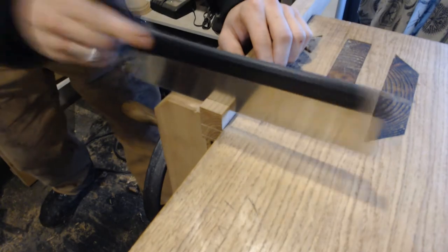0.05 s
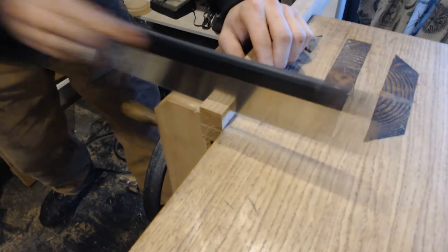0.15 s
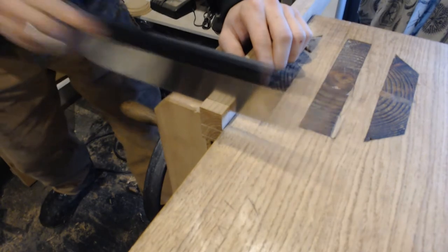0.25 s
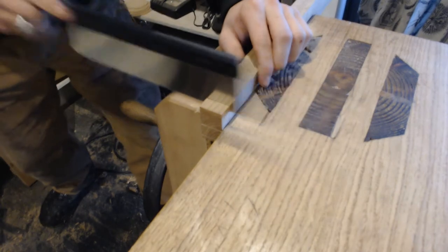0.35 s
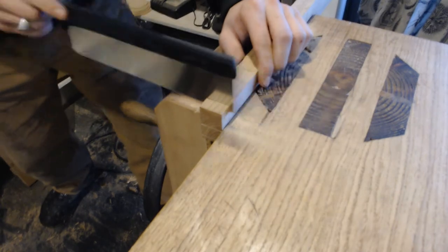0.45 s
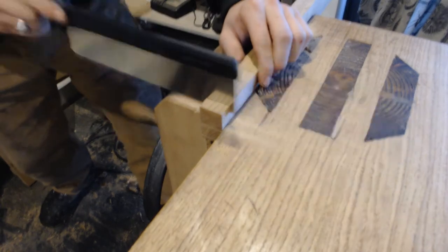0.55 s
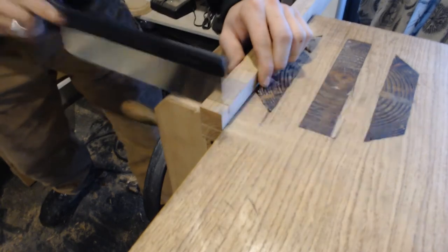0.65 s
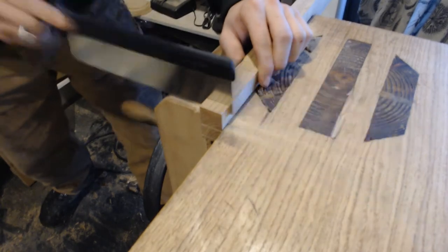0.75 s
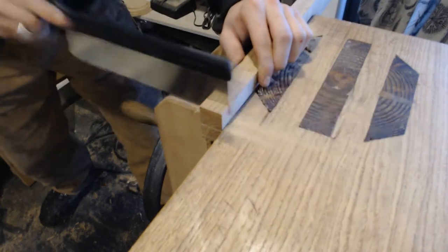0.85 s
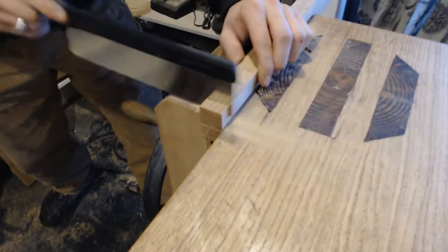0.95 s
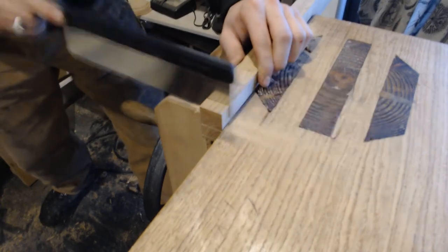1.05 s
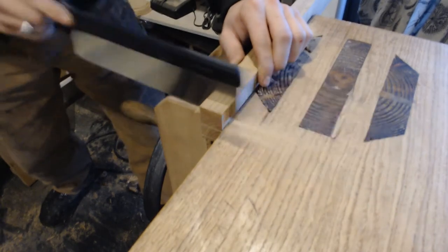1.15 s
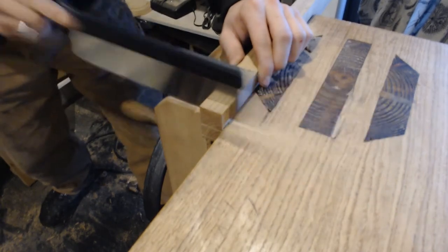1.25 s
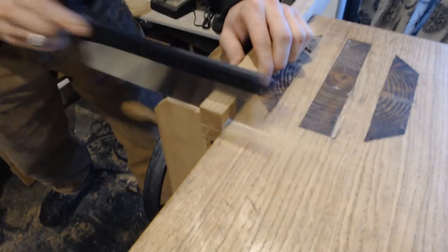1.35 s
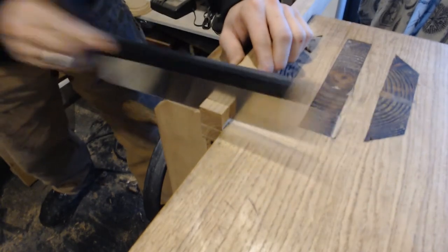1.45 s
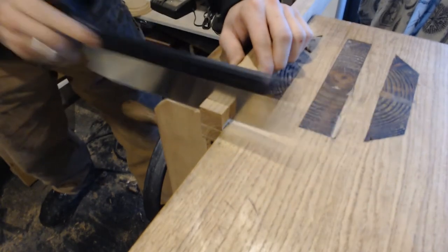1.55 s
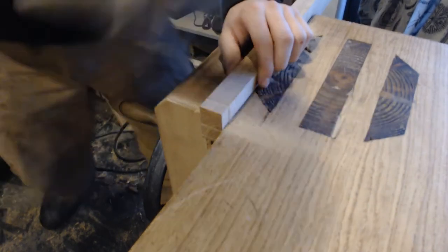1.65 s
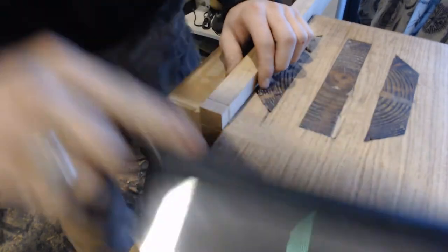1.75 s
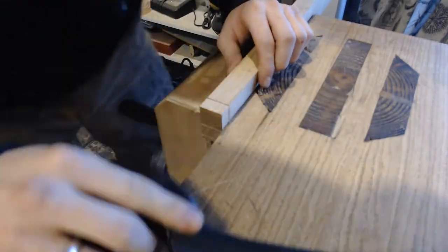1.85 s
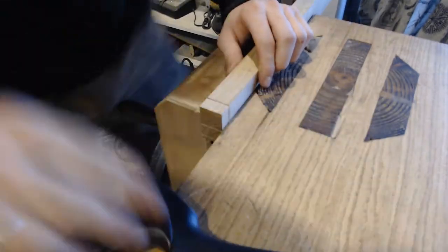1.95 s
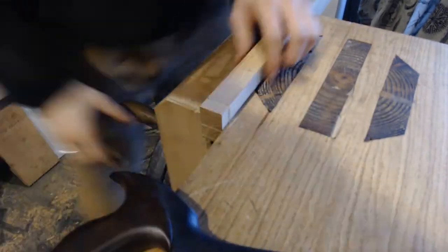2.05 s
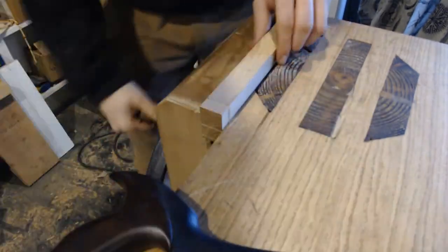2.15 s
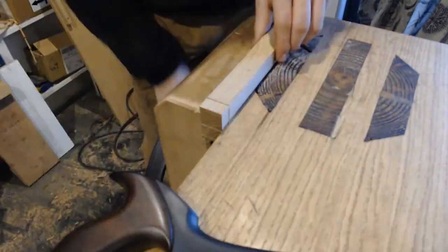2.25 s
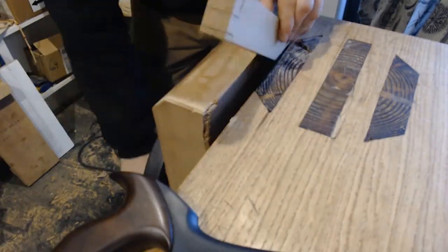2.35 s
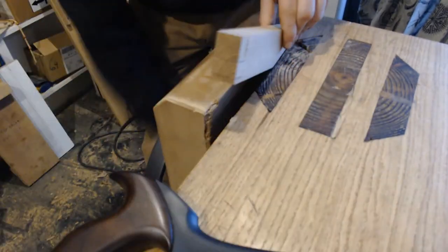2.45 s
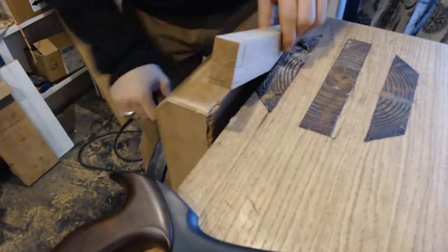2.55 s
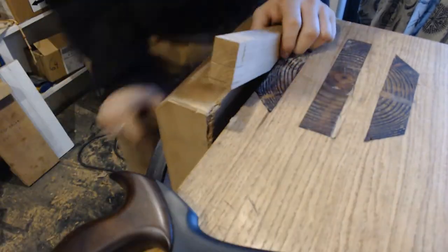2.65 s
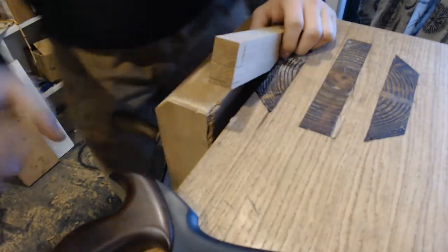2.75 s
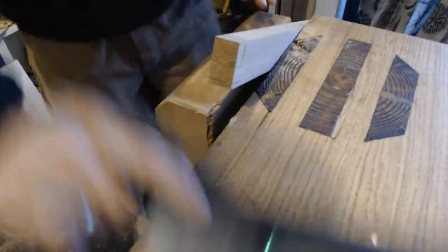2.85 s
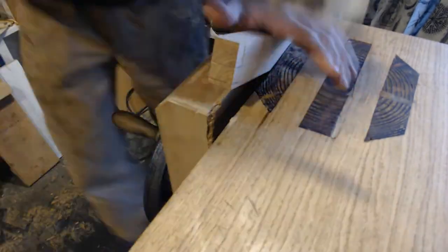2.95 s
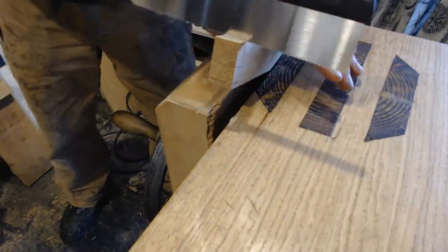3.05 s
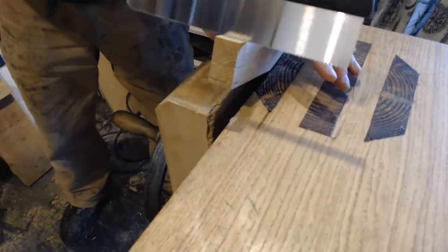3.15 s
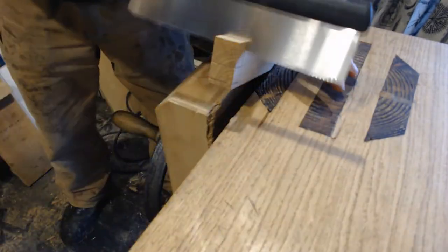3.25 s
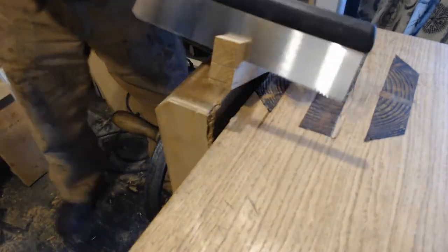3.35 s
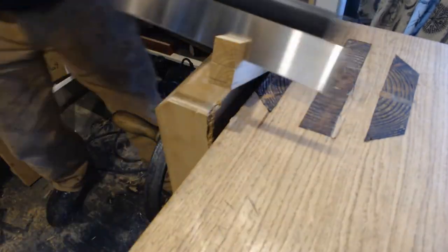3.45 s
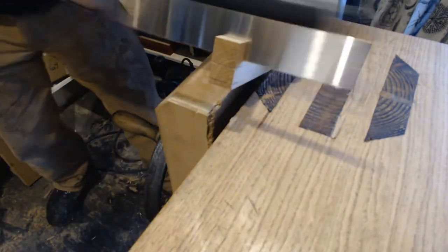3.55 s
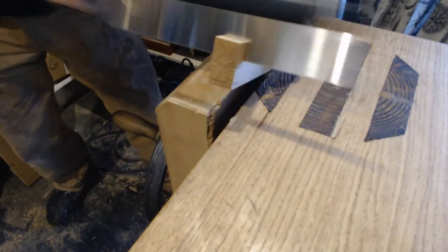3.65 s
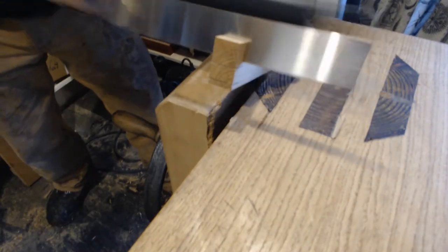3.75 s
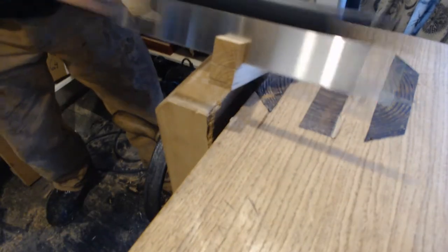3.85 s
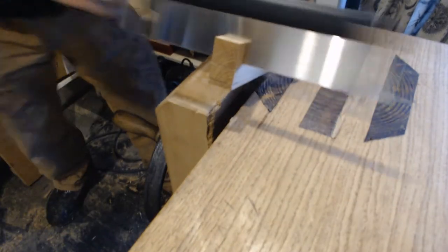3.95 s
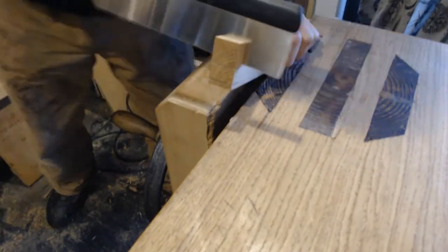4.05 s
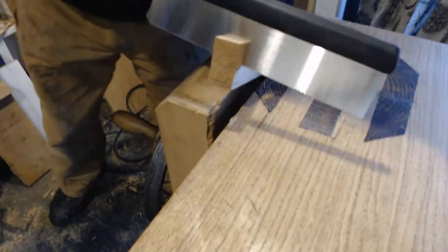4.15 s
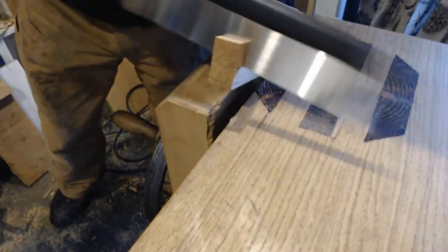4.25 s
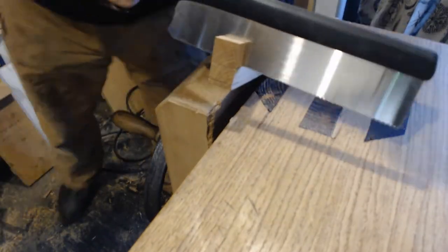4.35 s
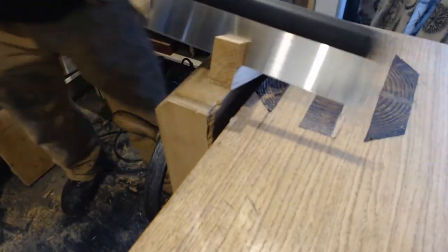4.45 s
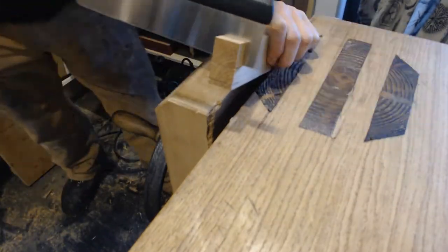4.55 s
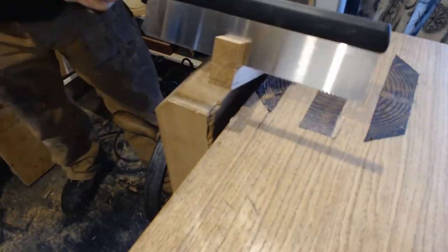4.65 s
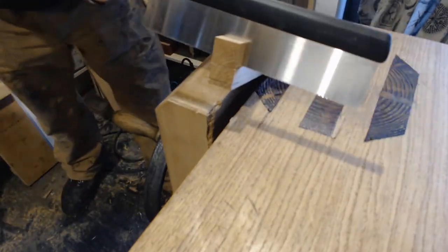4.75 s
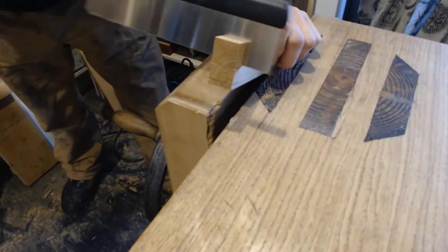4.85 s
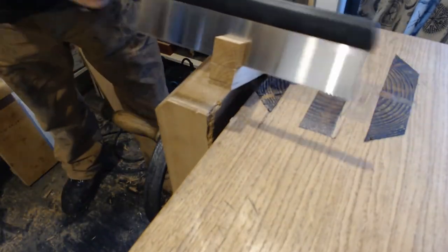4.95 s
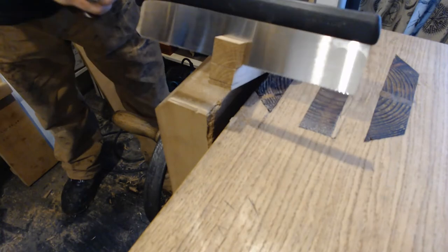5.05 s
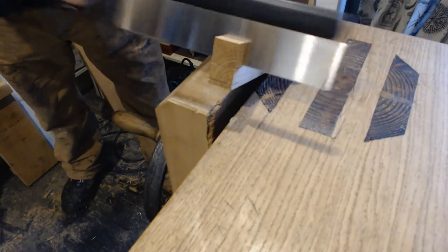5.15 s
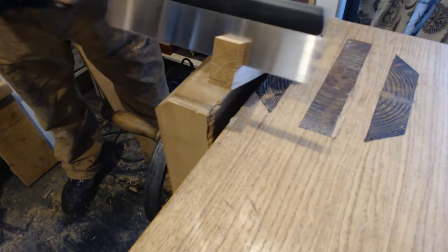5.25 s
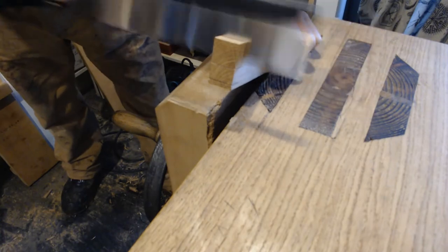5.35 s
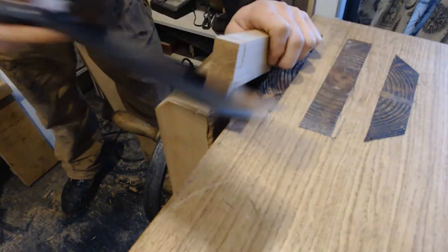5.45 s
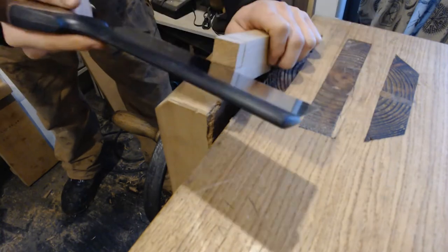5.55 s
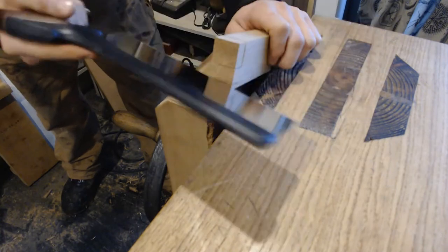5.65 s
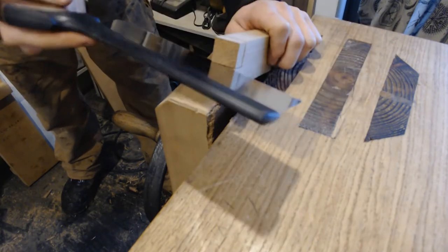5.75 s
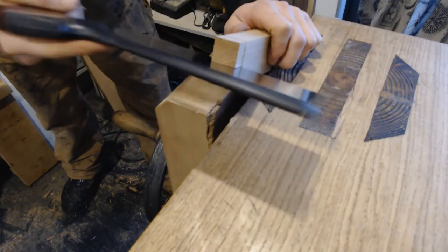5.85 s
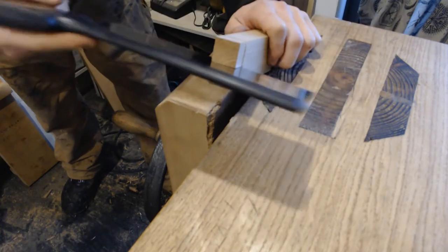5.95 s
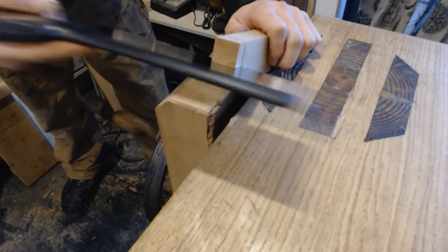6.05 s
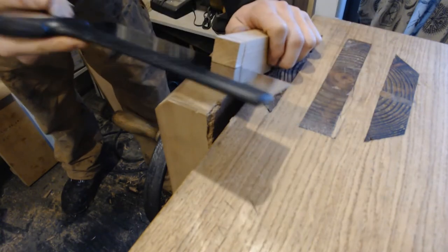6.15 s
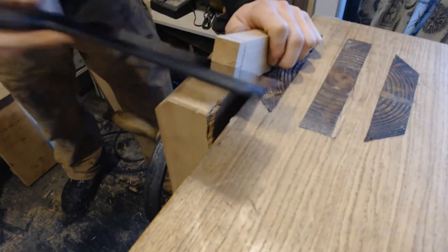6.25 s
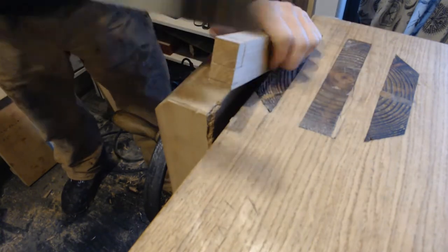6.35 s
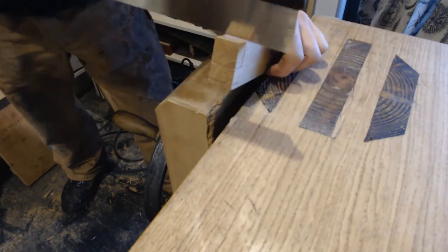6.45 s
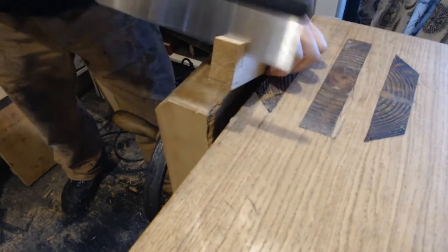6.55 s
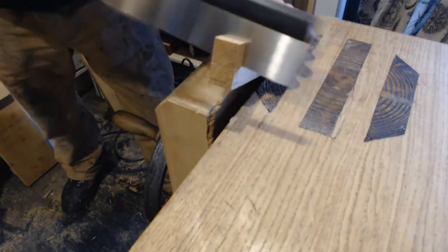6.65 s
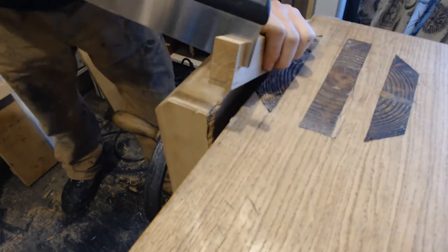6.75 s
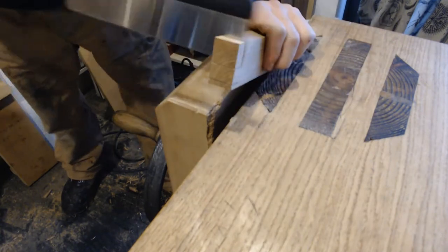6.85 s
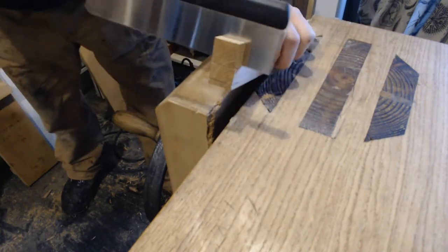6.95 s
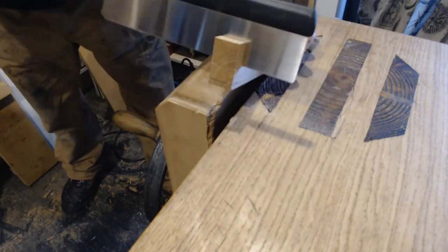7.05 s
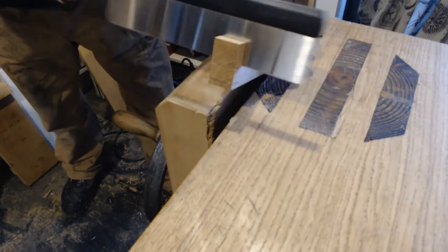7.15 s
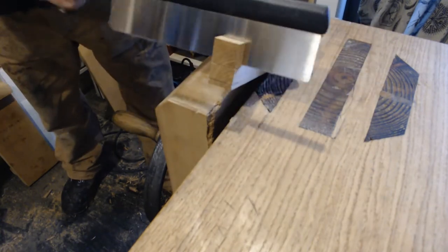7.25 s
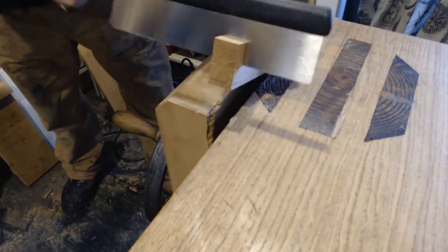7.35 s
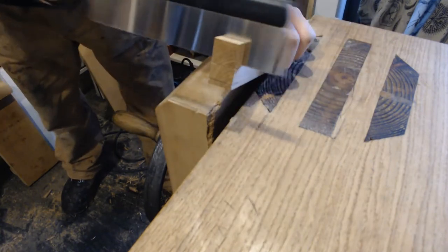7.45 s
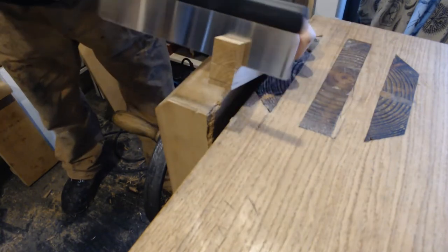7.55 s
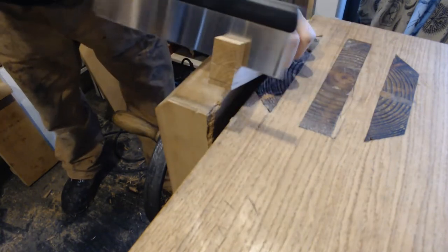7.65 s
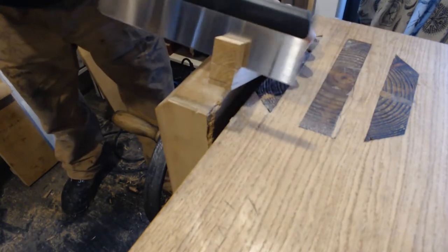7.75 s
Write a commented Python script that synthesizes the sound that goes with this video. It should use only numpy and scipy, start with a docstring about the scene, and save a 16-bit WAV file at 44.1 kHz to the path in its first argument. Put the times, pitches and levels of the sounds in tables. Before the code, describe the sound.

Rapid, bright back-and-forth sawing in a small workshop stops with steel and wood clacks, then resumes as hollow, uneven bursts of woody rasping.

```python
"""Fast drumming and rasping of a fine-toothed hand saw across the grain of a small clamped wooden piece;
then taps and scrapes of steel and wood, and slower, halting strokes along the grain of the turned piece.
Tooth kicks ring wood modes and torn-fibre noise feeds a bright rasp; gliding tones squeal where the blade binds.
Hard strokes add a hollow note, and one short low thump falls at a hard stroke, made by a single smooth pulse;
air, hum and rustle fill a small workshop."""
import sys
import numpy as np
from scipy import signal
from scipy.fft import rfft, irfft
from scipy.io import wavfile
from scipy.ndimage import uniform_filter1d

SR = 44100
rng = np.random.default_rng(int(sys.argv[2]) if len(sys.argv) > 2 else 0)


def materialize(psi):
    """Save the field psi as 16-bit PCM at rate SR to the path in sys.argv[1].

    A 1-D psi becomes a single channel; in a 2-D psi each row is a channel.
    """
    bounded = np.clip(np.atleast_2d(psi).T, -1, 1)
    quanta = np.round(bounded * 32767).astype(np.int16)
    wavfile.write(sys.argv[1], SR, quanta)


N = 344421
RESPONSE_SIZE = 4096  # samples in a ring or colour response
HZ = np.maximum(np.fft.rfftfreq(RESPONSE_SIZE, 1 / SR), 1)
TIME = np.arange(N) / SR  # s

# Spectrum of the quiet workshop's air. Each row: frequency in Hz, relative level in dB.
AIR_SPECTRUM = [(25, -28), (70, -9), (120, -3.5), (175, 2.5), (320, -5), (470, -1), (1450, -13.5),
                (2000, -20.5), (16000, -51)]
# The workshop's hum. Each row: frequency in Hz, relative level in dB.
HUM_TONES = [(149, -61), (400, -59)]
# Hands and clothes moving. Each row: time in seconds, relative level in dB.
RUSTLE_LEVEL = [(1.75, -54), (2.3, -54), (2.45, -63), (3.05, -64), (4.4, -58), (5.1, -91.5), (5.7, -56),
                (6.8, -69)]

# Pulls across the grain. Each row: moment of full speed in seconds, wood level in dB.
CROSS_PULLS = [(.075, -25), (0.181, -19.5), (.294, -23.5), (0.406, -25), (0.518, -32.5), (.616, -24.5),
               (0.718, -23), (.818, -27), (0.92, -27.5), (1.02, -25), (1.116, -29), (1.212, -29.5),
               (1.299, -23), (1.384, -46), (1.485, -40), (1.585, -29.5)]
# How firmly the teeth tear across the grain. Each row: time in seconds, rasp level of a pull in dB.
CROSS_BITE = [(0, -33.5), (.075, -22.5), (.18, -20.5), (1.24, -19.5), (1.3, -23), (1.35, -30), (1.435, -41),
              (1.48, -28), (1.62, -27)]
# Arm speed across the grain. Each row: time in seconds, teeth per second of a pull at full speed in Hz.
CROSS_SPEED = [(0, 638), (.5, 883.4), (.9, 1048), (1.22, 1115), (1.3, 627), (1.55, 1115)]
# Fibres tearing across the grain. Each row: frequency in Hz, relative level in dB.
CROSS_RASP = [(200, -28), (1600, -2), (2500, 5), (6700, 7.5), (9800, 5.5), (10800, 0), (13500, 0),
              (15500, -6.5)]
# The clamped piece lying flat. Each row: mode frequency in Hz, width in Hz, relative level in dB.
FLAT_MODES = [(497, 81, -12), (829, 97, -4), (1050, 22.5, -2.5), (1177, 27.5, -2.5), (2172, 31, -8.5)]
# The blade held in the kerf. Each row: mode frequency in Hz, width in Hz, relative level in dB.
BLADE_MODES = [(3379, 67, 9.5), (3587, 144, -14.5), (4190, 110, -2), (5380, 46.7, -43), (6460, 510, 0.5),
               (10030, 77, -23)]
# The thin plate singing on by itself. Each row: mode frequency in Hz, width in Hz, relative level in dB.
PLATE_MODES = [(2880, 3, 4.5), (3700, 10, 8.5), (4540, 3.98, 6), (7036, 4.5, -3), (8600, 9.2, -6)]

# The blade binds and squeals. Each row: middle in seconds, half length in seconds, pitch at the start in Hz,
# pitch at the end in Hz, level in dB.
SQUEALS = [(0.749, 0.012, 3700, 2700, -32.5), (3.704, 0.0064, 2302, 1180, -14),
           (3.806, 0.012, 2590, 2260, -27.5), (3.898, 0.0078, 2825, 1997, -10),
           (3.899, 0.0091, 2245, 2233, -11), (3.992, .008, 2190, 1870, -10),
           (4.217, 0.013, 2435, 3220, -34), (4.288, 0.013, 788, 1100, -32),
           (4.293, 0.013, 6200, 6630, -26.5), (5.405, 0.0095, 6030, 8250, -33.5)]
# Taps of saw and workpiece. Each row: start in seconds, relative steel level in dB, relative wood level in dB.
TAPS = [(1.344, -37, -44), (1.634, -31, -34), (1.8315, -24.5, -51), (1.963, -20.5, -18.5),
        (2.094, -68, -32.5), (2.223, -61, -44), (2.338, -58, -40), (2.423, -76, -46), (2.846, -45, -29.5),
        (2.8937, -20, -69), (2.9475, -30.5, -66), (3.029, -44, -41.5), (3.159, -38.5, -30),
        (3.222, -53, -34), (3.277, -35.5, -27.5), (3.326, -28, -34), (3.476, -57, -25), (3.555, -54, -28),
        (5.08, -50.5, -63), (5.552, -55.5, -41.5), (6.2447, -32.5, -49), (6.2848, -36.5, -38),
        (6.2962, -31.5, -40), (6.463, -66, -32.5), (6.528, -45, -37.5), (6.842, -46.5, -38),
        (7.381, -43.5, -41)]
# Free steel. Each row: mode frequency in Hz, width in Hz, relative level in dB.
STEEL_MODES = [(3300, 20, -18), (5520, 150, 7.5), (6270, 160, 3.5), (6880, 82, 6), (7960, 50, 6),
               (9000, 43, 6.5), (11150, 69, 0)]
# A knocked block. Each row: mode frequency in Hz, width in Hz, relative level in dB.
BLOCK_MODES = [(628, 120, -6.5), (1240, 40, 5), (1970, 110, -1), (2460, 130, -3.5), (3380, 154, -8)]
# Blade and workpiece sliding without cutting. Each row: moment of full force in seconds, rise in seconds,
# fall in seconds, wood level in dB, rasp level in dB.
SLIDES = [(1.779, .012, 0.0097, -47, -39.5), (1.857, 0.017, 0.034, -45.5, -36),
          (1.974, .012, 0.0074, -22, -25), (2.145, 0.02, 0.013, -39, -31), (2.886, .012, 0.0055, -70, -29),
          (3.333, 0.013, 0.0052, -22, -49), (3.406, .035, 0.026, -61, -42.5),
          (5.403, 0.01, 0.0071, -61, -28)]

# Pulls along the grain. Each row: moment of full speed in seconds, rise plus fall in seconds, wood level in dB.
RIP_PULLS = [(3.49, 0.031, -19.5), (3.583, 0.044, -23.5), (3.685, 0.036, -16.5), (3.786, 0.04, -19),
             (3.886, 0.028, -15), (3.981, .036, -20), (4.052, 0.03, -25.5), (4.138, 0.043, -25),
             (4.217, 0.025, -26), (4.281, 0.039, -18), (4.496, 0.073, -31.5), (4.612, 0.043, -14.5),
             (4.834, 0.049, -25.5), (4.949, 0.057, -19), (5.179, 0.03, -22.5), (5.236, 0.038, -26.5),
             (5.307, .058, -25), (5.359, 0.043, -24), (5.671, 0.072, -33.5), (5.823, 0.026, -24),
             (5.895, 0.048, -35), (5.978, 0.026, -24.5), (6.096, 0.075, -27.5), (6.598, 0.041, -24.5),
             (6.699, .046, -28), (6.901, .054, -26.5), (7.014, 0.033, -20), (7.119, 0.031, -27),
             (7.225, 0.035, -25), (7.271, .036, -32.5), (7.437, 0.054, -33.5), (7.493, 0.035, -22.5),
             (7.556, 0.049, -28), (7.636, .036, -25.5), (7.722, 0.038, -25), (7.793, 0.057, -26.5)]
# Rasp along the grain, strongest while the blade runs deep and fast.
# Each row: time in seconds, rasp level against the wood level in dB.
RIP_BITE = [(3.5, -12.5), (3.58, 2.5), (3.7, 1.5), (3.9, 4.5), (4.22, -3.5), (4.6, -5), (4.85, -9),
            (6.1, -9), (7.8, -7.5)]
# Arm speed along the grain. Each row: time in seconds, teeth per second at full speed in Hz.
RIP_SPEED = [(3.5, 792.5), (4.65, 791), (5.33, 556.5), (5.75, 804), (6.15, 770), (6.6, 480), (7.2, 755.7),
             (7.8, 598)]
# Fibres tearing along the grain. Each row: frequency in Hz, relative level in dB.
RIP_RASP = [(200, -25.5), (700, 2), (2300, 5), (3000, 4.5), (4500, 2), (6700, -0.5), (9800, -1),
            (10800, -5.5), (15500, -13)]
# The piece standing on edge. Each row: mode frequency in Hz, width in Hz, relative level in dB.
EDGE_MODES = [(251, 27.7, -16.5), (453.7, 17, -9), (546.5, 24, -8.5), (793.4, 58, -4), (1090, 30, 1.5),
              (1180.7, 19.2, 5), (1329.4, 26.6, 5.5), (1635, 28, -13), (1953, 110, -11.5),
              (2445, 200, -16.5)]
# Pulls in rhythm are joined by a push. The pair: shortest and longest gap between such pulls in seconds.
RHYTHM_GAP = (.08, .13)

# Quick strokes: rise plus fall of pull and push, and the share spent speeding up.
CROSS_PULL_S, CROSS_PUSH_S, CROSS_RISE_SHARE = 0.04, 0.036, 0.46
# The teeth skid on the push: its wood level, then its rasp and speed against the pull.
PUSH_WOOD_DB, PUSH_RASP_DB, PUSH_SPEED_SHARE = -37.5, -4, 0.72
RIP_RISE_SHARE = 0.37
# The push back along the grain: rise plus fall, level against the lighter pull beside it,
# further change of rasp in dB (negative: less rasp).
RETURN_S, RETURN_DB, RETURN_RASP_DB = 0.04, -7, -2.5
THUMP_S = 3.891  # start of the short low thump


def undb(db):
    """Decibels to gain."""
    return 10 ** (np.asarray(db) / 20)


def unit(x):
    """Scale to an rms of one."""
    return x / np.sqrt(np.mean(x ** 2))


def add(out, x, start_s):
    """Mix x into out from start_s on."""
    i = int(start_s * SR)
    a, b = max(i, 0), min(i + len(x), N)
    out[a:b] += x[a - i:b - i]


def at(curve, s):
    """Value of a (time, value) curve at time s."""
    return np.interp(s, *np.transpose(curve))


def walk(size, hz):
    """Smooth random drift, hz knots a second, with a spread of about one."""
    knots = np.arange(size) * hz / SR
    return 1.2 * np.interp(knots, np.arange(size), rng.standard_normal(size))


def colour(points):
    """Minimum-phase response with the given (Hz, dB) spectrum and unit energy."""
    hz, db = np.transpose(points)
    level_db = np.interp(np.log(HZ), np.log(hz), db)
    cepstrum = irfft(np.log(undb(level_db)))
    # folding the cepstrum onto positive time puts the energy first
    cepstrum[1:RESPONSE_SIZE // 2] *= 2
    cepstrum[RESPONSE_SIZE // 2 + 1:] = 0
    h = irfft(np.exp(rfft(cepstrum)))
    return h / np.linalg.norm(h)


def ring(modes, size=RESPONSE_SIZE, scatter_db=0, detune=0):
    """Unit-energy damped modes; weights and tuning can scatter with the point of contact and the grip."""
    t = np.arange(size) / SR
    weight, shift = rng.standard_normal((len(modes), 2)).T
    h = np.zeros(size)
    for k, (hz, width, db) in enumerate(modes):
        gain = (-1) ** k * undb(db + scatter_db * weight[k]) * width
        decay = np.exp(-np.pi * width * t)
        h += gain * decay * np.cos(2 * np.pi * hz * (1 + detune * shift[k]) * t)
    return h / np.linalg.norm(h)


def excite(source, force, response):
    """Drive a response with source under a force curve; the force sets the level."""
    y = signal.fftconvolve(source * force, response)
    return y * np.linalg.norm(force) / np.linalg.norm(y)


def swing(rise, fall):
    """One movement: its position u (0 at full speed, running from -2 to 2 between the turns) and a bell of
    force."""
    t = np.arange(-int(2 * rise * SR), int(2 * fall * SR)) / SR
    u = t / np.where(t < 0, rise, fall)
    return u, np.exp(-u ** 2)


def fibres(size, spread_db):
    """Dense snaps of wood fibres: noise whose strength jumps every 16 samples, a few far larger than the rest."""
    strength = undb(spread_db * rng.standard_normal(size // 16 + 1))
    return unit(np.repeat(strength, 16)[:size] * rng.standard_normal(size))


def workshop(air_db, hum_db, waver, rustle_db):
    """Steady air noise, a wavering hum, and the uneven rustle of the worker."""
    air = unit(signal.fftconvolve(rng.standard_normal(N), colour(AIR_SPECTRUM))[:N])
    hum = np.zeros(N)
    for hz, db in HUM_TONES:
        phase = 2 * np.pi * np.cumsum(hz * (1 + waver * walk(N, 25))) / SR
        hum += undb(db) * unit(np.sin(phase))
    brushing = fibres(N, 5) * undb(4 * walk(N, 20) + 3 * walk(N, 140))
    rustle = unit(signal.fftconvolve(brushing, colour(RIP_RASP))[:N])
    return undb(air_db) * air + undb(hum_db) * hum + undb(rustle_db + at(RUSTLE_LEVEL, TIME)) * rustle


def stroke_row(s, length, rise_share, wood_db, rasp_db, tooth_hz):
    """One stroke: (s at full speed, rise s, fall s, wood dB, rasp dB, teeth per second at full speed)."""
    rise = length * rise_share
    return s, rise, length - rise, wood_db, rasp_db, tooth_hz


def cross_strokes():
    """An even push and pull: a light push halfway between the pulls; one opens and one closes the run."""
    strokes = []
    for s, db in CROSS_PULLS:
        strokes.append(stroke_row(s, CROSS_PULL_S, CROSS_RISE_SHARE, db, at(CROSS_BITE, s), at(CROSS_SPEED, s)))
    # mirrored pull times at both ends place the outer pushes
    times = np.pad(np.transpose(CROSS_PULLS)[0], 1, mode="reflect", reflect_type="odd")
    for s in (times[:-1] + times[1:]) / 2:
        rasp_db = at(CROSS_BITE, s) + PUSH_RASP_DB
        tooth_hz = PUSH_SPEED_SHARE * at(CROSS_SPEED, s)
        strokes.append(stroke_row(s, CROSS_PUSH_S, CROSS_RISE_SHARE, PUSH_WOOD_DB, rasp_db, tooth_hz))
    return sorted(strokes)


def cut(strokes, modes, rasp_colour, jitter, slowing, tear_db, buzz_db, blade_db, chatter_db, catch_db,
        grit_db, bench_db):
    """Saw strokes: each tooth kicks the wood and tears a puff of fibres; the tooth rate follows the arm's speed."""
    out = np.zeros(N)
    bench = colour([(25, -17.5), (90, -5), (260, -11.0), (600, -25)])  # Hz, dB
    t = np.arange(RESPONSE_SIZE) / SR
    tearing = colour(rasp_colour)
    for s, rise, fall, wood_db, rasp_db, tooth_hz in strokes:
        u, force = swing(rise, fall)
        size = len(u)
        wood = ring(modes, scatter_db=1.5, detune=0.0099)
        # the rasp passes through the steel sheet's crowded, damped modes, which change with its place in the kerf
        sheet = rng.standard_normal(RESPONSE_SIZE) * np.exp(-t / .0035)
        fibre_colour = signal.fftconvolve(tearing, sheet / np.linalg.norm(sheet))[:RESPONSE_SIZE]
        rasp = fibre_colour + undb(blade_db) * ring(BLADE_MODES, scatter_db=2.0)

        catching = unit(undb(catch_db * walk(size, 183)))  # the grain grabs and lets go
        speed = np.exp(-slowing * np.maximum(u, -u / 2) ** 2)  # the arm brakes harder than it starts
        teeth = np.cumsum(tooth_hz * speed * (1 + jitter * walk(size, 500))) / SR  # running tooth count
        depth = undb(chatter_db * rng.standard_normal(size))[np.abs(teeth).astype(int)]  # no two bite alike
        kicks = np.diff(np.floor(teeth), prepend=0) * depth
        kicks = unit(kicks - uniform_filter1d(kicks, size=150))
        puffs = unit(fibres(size, grit_db) * depth * (1 + 0.41 * np.cos(2 * np.pi * teeth)))

        stroke = undb(wood_db) * excite(catching * (kicks + undb(tear_db) * puffs), force, wood)
        stroke += undb(rasp_db) * excite(catching * (puffs + undb(buzz_db) * kicks), force, rasp)
        stroke += undb(rasp_db + bench_db) * excite(puffs, force, bench)  # the bench rumbles under the load
        add(out, stroke, s - 2 * rise)
    return out


def rocking(strokes, db, onset_db, growth, waver, slowing):
    """Hard strokes rock the piece at the tooth rate: a hollow note, growing faster than the load, sags in braking."""
    out = np.zeros(N)
    for s, rise, fall, wood_db, _, tooth_hz in strokes:
        u, force = swing(rise, fall)
        hz = tooth_hz * np.exp(-slowing * np.maximum(u, 0) ** 2) * (1 + waver * walk(len(u), 500))
        note = np.sin(2 * np.pi * np.cumsum(hz) / SR) * undb(2 * walk(len(u), 200))
        level_db = wood_db + db + growth * min(wood_db - onset_db, 0)
        add(out, undb(level_db) * note * force ** 2, s - 2 * rise)
    return out


def plate(x, db):
    """Shaking by x leaves the blade singing faintly in its narrow, slowly dying modes."""
    return undb(db) * signal.fftconvolve(x, ring(PLATE_MODES, size=SR // 2))[:N]


def squeal(half, from_hz, to_hz, waver=0.018, overtone_db=-13, rough_db=5.5):
    """The pinched blade sticks and slips: a short rough glide with two overtones."""
    u = np.linspace(-2, 2, int(4 * half * SR))
    hz = (from_hz + (to_hz - from_hz) * (1 + np.tanh(u)) / 2) * (1 + waver * walk(len(u), 914))
    phase = 2 * np.pi * np.cumsum(hz) / SR
    tone = sum(undb(k * overtone_db) * np.sin((k + 1) * phase) for k in range(3))
    return undb(rough_db * walk(len(u), 600)) * unit(tone) * np.exp(-u ** 2)


def squeals(chirp_db, low_hz, high_hz):
    """Squeals where the blade binds, and a small chirp as each quick stroke ends: up on the pull, down on the push."""
    out = np.zeros(N)
    for s, half, from_hz, to_hz, db in SQUEALS:
        add(out, undb(db) * squeal(half, from_hz, to_hz), s - 2 * half)
    for k, (s, rise, fall, _, rasp_db, _) in enumerate(cross_strokes()):
        is_pull = k % 2  # the run opens with a push
        glide = np.array([low_hz, high_hz] if is_pull else [high_hz, low_hz])
        glide = glide * np.exp(0.097 * rng.standard_normal())
        add(out, undb(rasp_db + chirp_db) * squeal(fall / 2, *glide), s - fall / 2)
    return out


def taps(steel_db, wood_db, crack_db, steel_contact_s, wood_contact_s):
    """Brief gritty contacts that ring the steel and the block."""
    out, t = np.zeros(N), np.arange(RESPONSE_SIZE) / SR
    crack = undb(crack_db) * colour(CROSS_RASP)
    for s, steel_tap_db, wood_tap_db in TAPS:
        grit = rng.standard_normal(RESPONSE_SIZE)
        steel = ring(STEEL_MODES, scatter_db=6.0) + crack
        block = ring(BLOCK_MODES, scatter_db=1)
        add(out, undb(steel_db + steel_tap_db) * excite(grit, np.exp(-t / steel_contact_s), steel), s)
        add(out, undb(wood_db + wood_tap_db) * excite(grit, np.exp(-t / wood_contact_s), block), s)
    return out


def slides(grit_db, steel_db, flat_db):
    """Light scrapes of the blade leaving the kerf and of the piece shifting in the vice: grit drives wood and steel."""
    out = np.zeros(N)
    wood = ring(BLOCK_MODES) + undb(flat_db) * ring(FLAT_MODES)
    scrape = colour(CROSS_RASP) + undb(steel_db) * ring(STEEL_MODES)
    for s, rise, fall, wood_db, rasp_db in SLIDES:
        u, force = swing(rise, fall)
        grit = fibres(len(u), grit_db)
        slide = undb(wood_db) * excite(grit, force, wood)
        slide += undb(rasp_db) * excite(grit, force, scrape)
        add(out, slide, s - 2 * rise)
    return out


def rip_strokes():
    """Halting pulls that bite fast and ease off; wherever they fall into a rhythm, a lighter push joins them."""
    strokes = []
    for s, length, db in RIP_PULLS:
        strokes.append(stroke_row(s, length, RIP_RISE_SHARE, db, db + at(RIP_BITE, s), at(RIP_SPEED, s)))
    for (before, _, before_db), (after, _, after_db) in zip(RIP_PULLS, RIP_PULLS[1:]):
        if RHYTHM_GAP[0] < after - before < RHYTHM_GAP[1]:
            s = (before + after) / 2
            db = min(before_db, after_db) + RETURN_DB
            rasp_db = db + at(RIP_BITE, s) + RETURN_RASP_DB
            strokes.append(stroke_row(s, RETURN_S, .5, db, rasp_db, at(RIP_SPEED, s)))
    return strokes


def thump(db, rise_s):
    """One short low thump: a smooth pulse that peaks after rise_s and dies away, high-passed at 40 Hz."""
    out, u = np.zeros(N), np.arange(RESPONSE_SIZE) / SR / rise_s
    add(out, undb(db) * u * np.exp(1 - u), THUMP_S)
    return signal.sosfilt(signal.butter(1, 40, "high", fs=SR, output="sos"), out)


def walls(x, wet_db, t60_s, dull_hz):
    """Short, dull reflections from the cluttered room: a decaying noise tail after 4 ms."""
    t = np.arange(SR // 2) / SR
    tail = rng.standard_normal(len(t)) * np.exp(-np.log(1000) * t / t60_s) * (t > .004)
    tail = signal.sosfilt(signal.butter(1, dull_hz, fs=SR, output="sos"), tail / np.linalg.norm(tail))
    return undb(wet_db) * signal.fftconvolve(x, tail)[:N]


def scene():
    """Both cuts and the handling between them, in the room."""
    room = workshop(air_db=-50.0, hum_db=1.5, waver=.025, rustle_db=2)
    across = cut(cross_strokes(), FLAT_MODES, CROSS_RASP, jitter=.04, slowing=.3, tear_db=3.0, buzz_db=-2.0,
                 blade_db=-6.0, chatter_db=0.5, catch_db=3.5, grit_db=2.5, bench_db=-26.5)
    along = cut(rip_strokes(), EDGE_MODES, RIP_RASP, jitter=.04, slowing=.4, tear_db=7.5, buzz_db=-8.5,
                blade_db=-10, chatter_db=3, catch_db=2.6, grit_db=1.0, bench_db=-46.0)
    tapping = taps(steel_db=4.5, wood_db=2.5, crack_db=-2.5, steel_contact_s=0.0039, wood_contact_s=0.0053)
    work = across + along + tapping
    work += plate(across, db=-20.0) + plate(tapping, db=-17.0)
    strokes = cross_strokes() + rip_strokes()
    work += rocking(strokes, db=2.0, onset_db=-12.5, growth=1.0, waver=0.022, slowing=0.14)
    work += squeals(chirp_db=-11.5, low_hz=3186, high_hz=4270)
    work += slides(grit_db=6.5, steel_db=-6.0, flat_db=-5.5)
    work += thump(db=-8.5, rise_s=0.00024)
    return (work + walls(work, wet_db=-9.5, t60_s=0.12, dull_hz=6750) + room)[None]


def record(dry):
    """The microphone rounds the loudest peaks; everything above 16 kHz is cut."""
    rounded = .88 * np.tanh(dry / .88)
    return signal.sosfilt(signal.ellip(10, .1, 90, 16000, fs=SR, output="sos"), rounded)


dry = scene()
out = record(dry)
materialize(out)
```